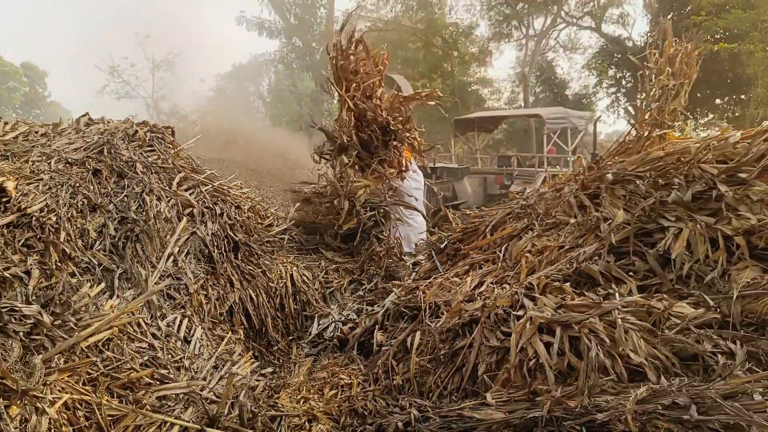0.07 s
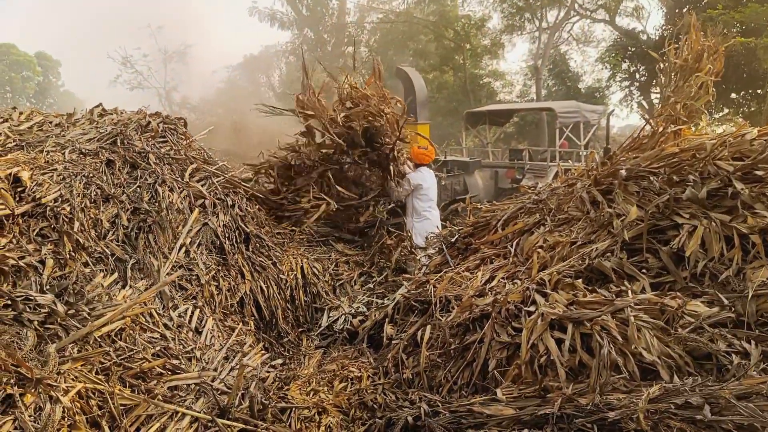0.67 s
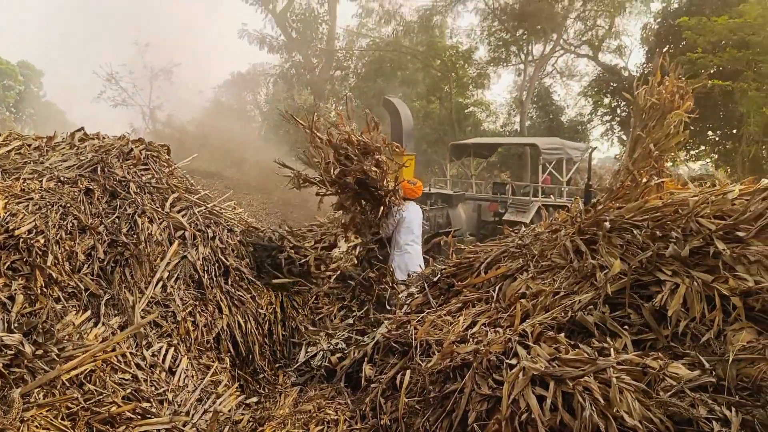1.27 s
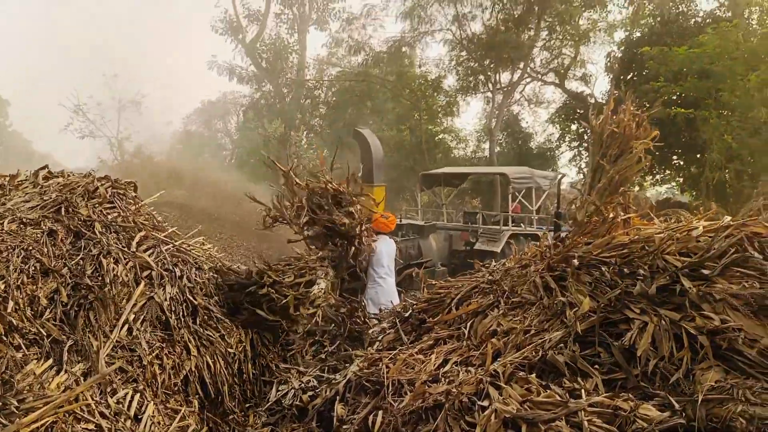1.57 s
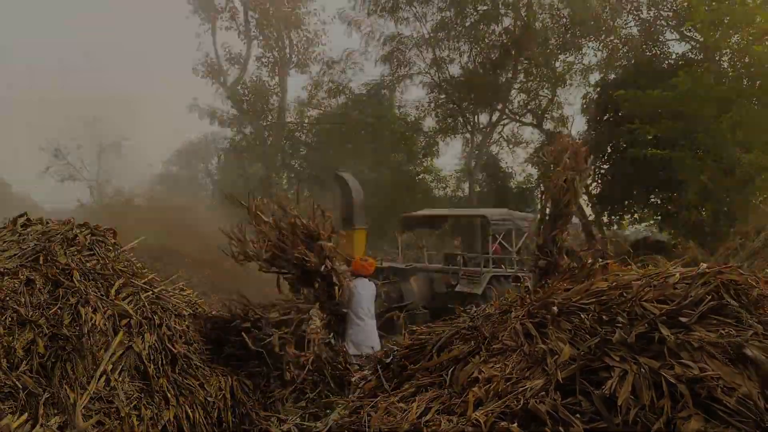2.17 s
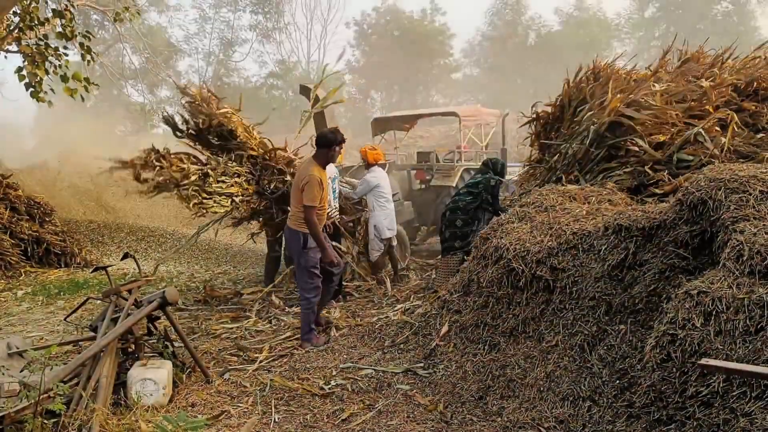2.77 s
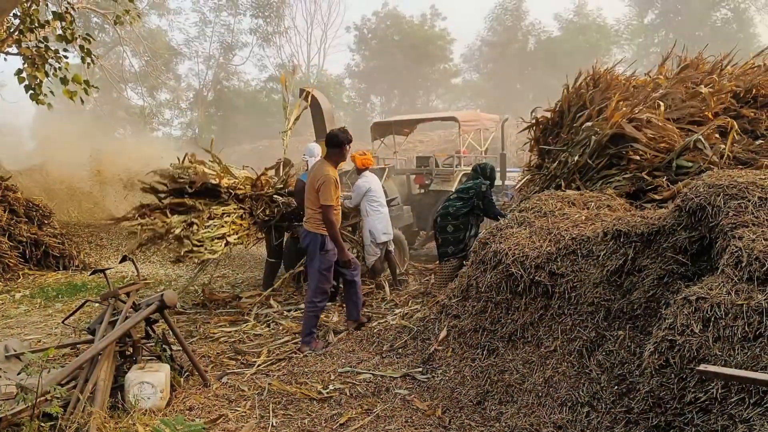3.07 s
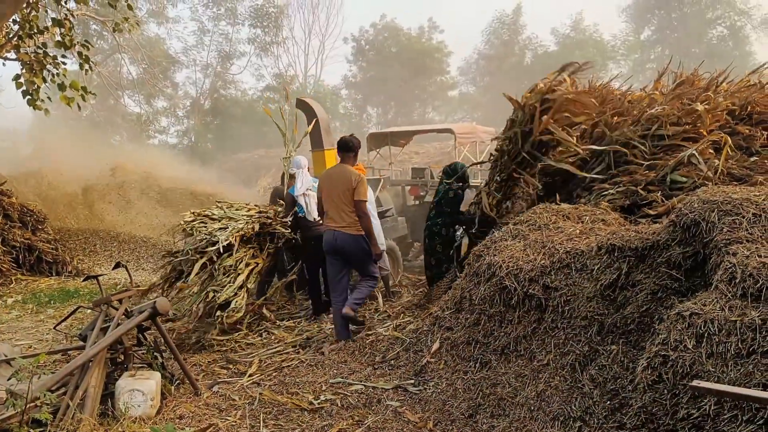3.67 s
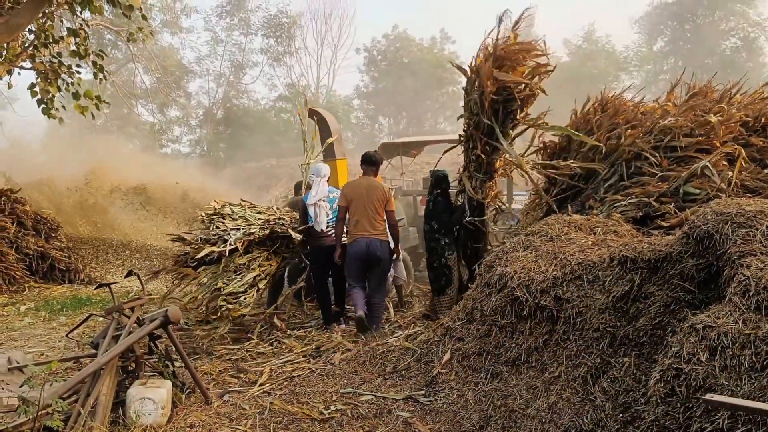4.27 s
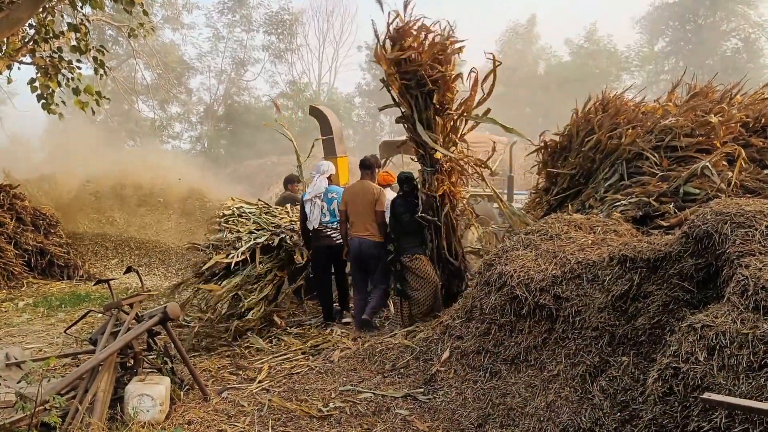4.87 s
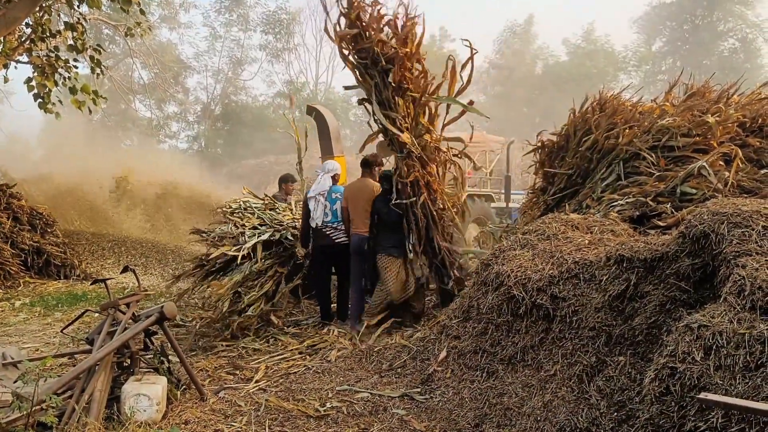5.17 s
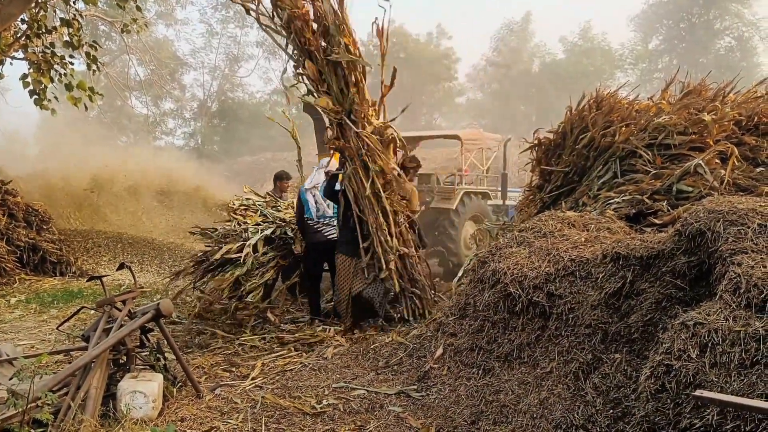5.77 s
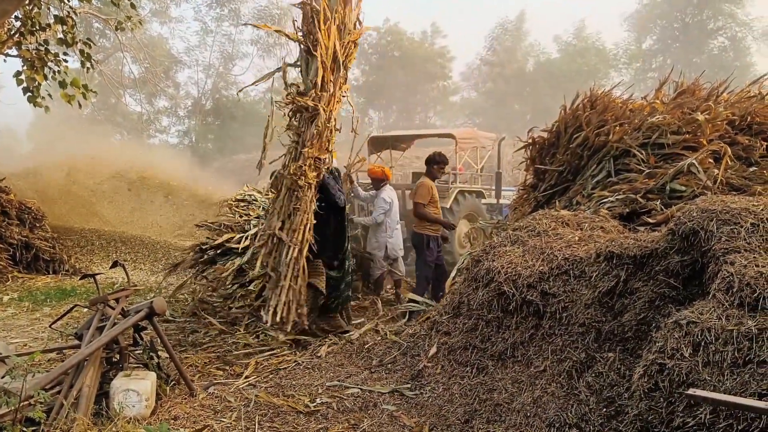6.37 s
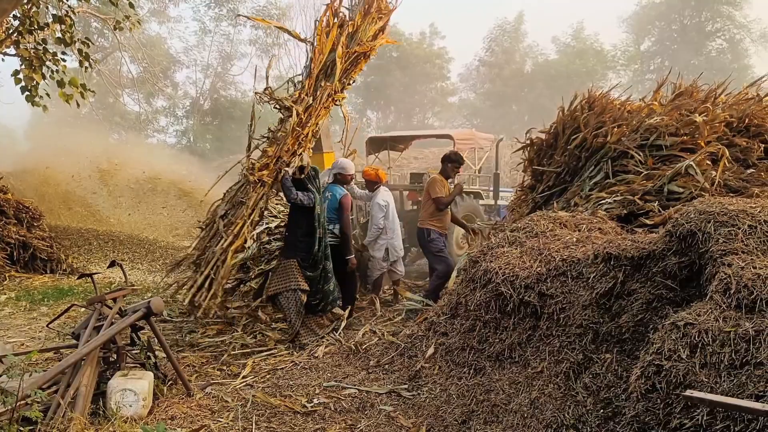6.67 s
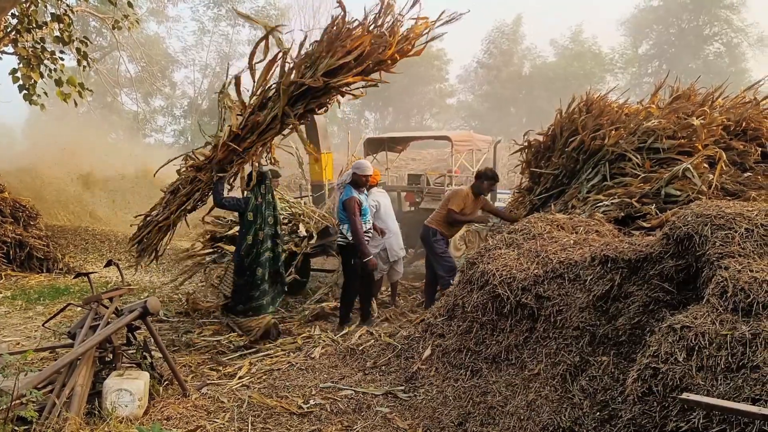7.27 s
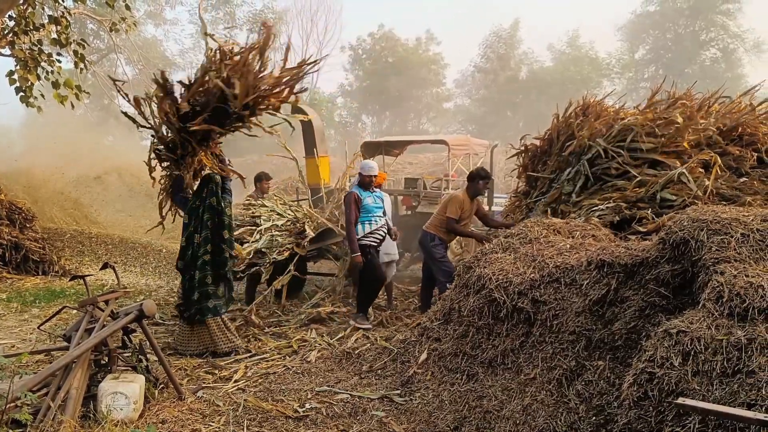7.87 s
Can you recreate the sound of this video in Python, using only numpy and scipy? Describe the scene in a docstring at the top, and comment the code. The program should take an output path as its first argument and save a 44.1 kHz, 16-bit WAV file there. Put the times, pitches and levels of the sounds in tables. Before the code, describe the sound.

Loud, rapid chopping pulses from a stalk cutter in a farmyard, with a steady air roar, the hiss of chaff up its spout and a droning tractor engine. The sound dips to silence a little after two seconds, then comes back from another side of the machine, rounder and with a faint hum of gears. Carried bundles rustle lightly, and toward the end thicker stalks crunch harder and ring against the steel knives.

```python
"""A rapid chopping, about 17 crunching thumps a second: a tractor drives a chaff cutter in an open yard.
Each knife stroke fractures stalks, and its paddle throws a puff of air that excites the housing's modes.
Thicker stalks crunch and ring harder; now and then a wad of leaves is shredded in one rush.
The blower roars, chaff hisses up the spout, the diesel drones and dry bundles rustle as they are carried.
The machine is heard from beside the stalk heap, then, after a fade, from the feeding side."""
import sys
import numpy as np
from scipy import signal
from scipy.fft import rfft, irfft
from scipy.io import wavfile

SR = 44100
rng = np.random.default_rng(int(sys.argv[2]) if len(sys.argv) > 2 else 0)


def master(y):
    """Save y as 16-bit WAV."""
    cut = np.clip(np.atleast_2d(y).T, -1, 1)
    pcm = np.round(cut * 32767)  # scale
    wavfile.write(sys.argv[1], SR, pcm.astype(np.int16))


N = 354123
TIME = np.arange(N) / SR
FREQS = np.maximum(np.fft.rfftfreq(N, 1 / SR), 1)


# cutting rate of the flywheel: t/s, f/Hz
HEAP_CUT_RATE = [(0.0, 16.35), (0.4, 16.586), (0.8, 16.703), (1.3, 16.62), (1.8, 16.755), (2.35, 16.659)]
FEED_CUT_RATE = [(2.35, 16.537), (3.0, 16.652), (3.6, 16.708), (4.2, 16.681), (4.7, 16.632), (5.2, 16.957),
                 (5.8, 16.905), (6.6, 17.028), (7.3, 16.865), (8.03, 16.795)]
# single cuts that stand out: t/s, extra thump level/dB, extra crunch level/dB
ACCENTS = [(1.02, 3, 2.5), (1.08, 4.5, 1.5), (1.8, -5, 0.5), (1.92, 4.5, 3), (3.1, 3, -3), (3.28, -6.5, 0),
           (3.46, 1.5, -1.5), (5.08, -0.5, 2), (5.2, -1.5, 7), (5.26, 3.5, 4), (6.14, 1.5, 1.5),
           (6.91, 4, 2)]
def knife_passes(rate, first_s, gap_db):
    """Periodic excitation: two knives thump in turn at +/- gap_db; gives times, thump dB, crunch dB."""
    count = np.cumsum(in_time(rate)[0]) / SR
    count -= np.interp(first_s, TIME, count)
    cuts = np.arange(np.ceil(count[0]), count[-1])
    times = np.interp(cuts, count, TIME)
    extra_db = np.zeros((2, len(times)))
    for s, thump_db, crunch_db in ACCENTS:
        extra_db[:, np.argmin(np.abs(times - s))] += thump_db, crunch_db
    return times, gap_db * np.cos(np.pi * cuts) + extra_db[0], extra_db[1]


def pulse_train(times, cut_db, width_s, uneven_db, jitter_s):
    """Spectrum of a train of Gaussian pulses, with random spread in strength and timing."""
    strength, late = rng.standard_normal((len(times), 2)).T
    samples = np.clip((times + jitter_s * late) * SR, 0, N - 1).astype(int)
    clicks = np.zeros(N)
    clicks[samples] = from_db(cut_db + uneven_db * strength)
    return rfft(clicks) * np.exp(-.5 * (2 * np.pi * FREQS * width_s) ** 2)


# modes of the housing: f/Hz, level against the puff/dB, T60/s
HEAP_MODES = [(81.6, -11, 0.13), (117.8, -9, 0.12), (153, -11, 0.091), (274, -6, 0.043)]
FEED_MODES = [(83, -17.5, 0.22), (116, -2.5, 0.12), (208.4, -14.5, 0.47), (252, -22.5, 0.33),
              (306, -18, 0.21), (392, -16, 0.026)]
def thumps(times, cut_db, modes, width_s, uneven_db, lag_s):
    """Pressure doublet: each paddle sucks, then pushes the air, and the housing's damped modes ring on."""
    doublet = -2j * np.pi * FREQS * width_s
    ring = sum(from_db(db - 60 * TIME / t60) * np.cos(2 * np.pi * hz * TIME) for hz, db, t60 in modes)
    puffs = pulse_train(times, cut_db, width_s, uneven_db, jitter_s=0.00028)
    return stereo(puffs * (doublet + rfft(ring) / (4 * width_s * SR)), lag_s)


# spectrum of snapping stalks: f/Hz, relative level/dB
HEAP_SNAP = [(50, -34), (150, -13), (330, -4), (550, -2), (800, -3), (1150, -8.5), (1500, -11), (2400, -9),
             (3500, -29.5), (6000, -13), (7500, -39), (14000, -49)]
FEED_SNAP = [(50, -48), (150, -15.5), (330, 3), (550, -5.5), (800, -5), (1150, -9), (1500, -8.5),
             (2400, -19), (3500, -30.5), (6000, -25.5), (7500, -37.5), (14000, -42.5)]
def crunches(times, cut_db, spectrum, lead_s, rise_s, decay_s, tail, tail_s, uneven_db, grain_db, lag_s):
    """Brittle fracture: stalks snap in a noise burst just before each thump; the pieces clatter after."""
    decay = np.exp(-TIME / decay_s) + tail * np.exp(-TIME / tail_s)
    bites = pulse_train(times, cut_db, rise_s, uneven_db, jitter_s=0.00048) * delay(-lead_s)
    bursts = irfft(bites * rfft(decay), N)
    return rms_one(bursts * from_db(grain_db * drift(880)) * air_noise(spectrum, lag_s))


# modes of the knives: f/Hz, bandwidth/Hz, relative level/dB
KNIFE_MODES = [(840, 150, 1.5), (1353, 110, 8), (2095, 114, 4.5), (2600, 160, 8), (4120, 210, 9)]
def clinks(times, load_db, uneven_db, lag_s, rise_s=0.00097, lead_s=.005):
    """Free vibration: thick stalks strike the steel, giving each mode a new strength at every cut."""
    ringing = 0
    for hz, width_hz, db in KNIFE_MODES:
        envelope = from_db(db) * np.exp(-np.pi * width_hz * TIME) * (1 - np.exp(-TIME / rise_s))
        strikes = pulse_train(times, 0, width_s=.00003, uneven_db=uneven_db, jitter_s=0.001192)
        ringing += strikes * rfft(envelope * np.sin(2 * np.pi * hz * TIME))
    level_db = -25 + 2.18 * (load_db - load_db.max())  # falls steeply below full load
    return from_db(level_db) * rms_one(stereo(ringing * delay(-lead_s), lag_s))


# wads of leaves under the knives: start t/s, end t/s, level/dB
LEAF_WADS = [(-0.1, .12, -26.5), (2.313, 2.962, -20.5), (5.943, 6.283, -29.5)]
# spectrum of tearing leaves: f/Hz, relative level/dB
TEARING = [(60, -22), (200, 2), (400, 4), (600, 0), (950, 0), (1500, 3.5), (2400, -4.5), (3300, -11),
           (5000, -10), (6300, -14), (8000, -35), (15000, -39)]
def shredding(attack_s=0.097, release_s=0.088):
    """Continuous tearing: a wad of leaves is dragged through in one coarse rush of broadband noise."""
    rush = sum(from_db(db) * np.interp(TIME, [start, start + attack_s, end, end + release_s], [0, 1, 1, 0])
               for start, end, db in LEAF_WADS)
    return rush * stream(TEARING, flutter_db=1.1, grain_db=1.5, lag_s=0.00017)


# spectrum of the blower's air flow: f/Hz, relative level/dB
HEAP_BLOWER = [(35, -14), (60, -16), (120, -10), (250, -5.5), (500, -2), (800, -4.5), (1200, -13),
               (1700, -12), (2350, -6), (3000, -18), (4000, -37.5)]
FEED_BLOWER = [(35, -45), (60, -22), (120, 2.5), (250, -7), (400, -3.5), (620, -10.5), (850, -11),
               (1130, -9), (1450, -5.5), (1850, -15), (2250, -9.5), (3000, -23), (4000, -42.5)]
def blower_roar(spectrum, load_db, level_db, **texture):
    """Flow noise: the blower roars a little louder as the load rises above its mean."""
    return from_db(level_db + 0.16 * (load_db - load_db.mean())) * stream(spectrum, **texture)


# spectrum of flying chaff: f/Hz, relative level/dB
HEAP_CHAFF = [(2400, -24), (3500, 0), (4500, -1), (5400, 2.5), (6200, 4.5), (6800, -7.5), (7500, -13.5),
              (9000, -24), (12000, -18), (15800, -40)]
FEED_CHAFF = [(2400, -4), (3500, -1.5), (4500, -1), (5400, -4), (6200, -1), (6800, -12), (7500, -15.5),
              (9000, -25), (12000, -20.5), (15800, -31)]
# gushes up the spout: middle t/s, duration/s, extra level/dB
CHAFF_GUSHES = [(.2, 0.61, 2), (0.94, .2, 5.5), (1.592, .2, 4), (1.933, 0.093, 4.5), (2.17, 0.28, 4),
                (3.72, 0.64, 1)]
def chaff_hiss(spectrum, load_db, level_db, **texture):
    """Particle noise: the hiss of chaff follows the load and swells with each gush."""
    gush_db = sum(db * swell(s, length) for s, length, db in CHAFF_GUSHES)
    return from_db(level_db + 0.36 * (load_db - load_db.mean()) + gush_db) * stream(spectrum, **texture)


def stream(spectrum, flutter_db, grain_db, lag_s):
    """Amplitude modulation: slow random flutter and fast grain roughen a steady flow noise; rms 1."""
    return rms_one(air_noise(spectrum, lag_s) * from_db(flutter_db * drift(26) + grain_db * drift(1200)))


# resonance of the spout: t/s, centre f/Hz, level/dB
SPOUT_BAND = [(0, 5860, -29.5), (.35, 6060, -28), (.6, 5970, -33), (1, 5900, -53), (1.3, 6330, -35.5),
              (2, 6400, -35), (2.35, 6260, -20.5)]
def spout_ring(width_hz=400, flutter_db=3):
    """Frictional excitation: chaff scouring the steel spout makes a narrow, shifting band of noise."""
    hz, db = in_time(SPOUT_BAND)
    phase = 2 * np.pi * np.cumsum(hz) / SR
    band = np.array([drift(width_hz) * np.cos(phase) + drift(width_hz) * np.sin(phase) for _ in range(2)])
    return from_db(db) * rms_one(band * from_db(flutter_db * drift(30)))


# engine orders: multiple of the crank rate, level/dB
ENGINE_ORDERS = [(1, -65), (2, -40.5), (3, -36.5), (4, -31), (6, -32.5)]
def diesel(rate, waver_db, waver_hz=4):
    """Harmonic series: the engine drones at multiples of its crank rate, each one wavering in level."""
    crank = 2.07 * cut_phase(rate)  # crank turns per cut
    drone = 0
    for order, db in ENGINE_ORDERS:
        gain = from_db(db + waver_db * drift(waver_hz))
        drone += gain * np.sin(order * crank + rng.uniform(0, 2 * np.pi))
    return np.sqrt(2) * drone


# gear hum: t/s, mesh tone level/dB, octave level/dB
GEAR_HUM = [(2.5, -35.5, -37), (4.2, -34.5, -43.5), (5, -35.5, -48), (6.1, -49, -36), (6.7, -35.5, -42.5),
            (8, -37, -40.5)]
def gears(waver_db):
    """Gear-mesh tone: fifteen teeth engage for each cut, and their play modulates the phase."""
    mesh = 15 * cut_phase(FEED_CUT_RATE) + .5 * drift(14)
    tone_db, octave_db = in_time(GEAR_HUM) + waver_db * drift(28)
    return np.sqrt(2) * (from_db(tone_db) * np.sin(mesh) + from_db(octave_db) * np.sin(2 * mesh))


# bundles being carried: middle t/s, duration/s, level/dB
RUSTLES = [(0.696, 0.46, -38.5), (1.6, .16, -45), (4.48, .32, -38.5), (5.114, 0.14, -33.5),
           (5.2, 0.14, -42), (5.62, .2, -44), (6.19, 0.19, -36.5), (6.31, 0.28, -36.5)]
# spectrum of dry leaves: f/Hz, relative level/dB
DRY_LEAVES = [(1500, -16), (4500, 10), (6300, 9), (8000, -7), (10000, -1), (12000, 0.5), (15800, -3)]
def bundles(grain_db):
    """Friction noise: dry leaves brush each other in swells of fine crackle."""
    brushing = sum(from_db(db) * swell(s, length) for s, length, db in RUSTLES)
    return brushing * rms_one(air_noise(DRY_LEAVES, lag_s=0) * from_db(grain_db * drift(1500)))


# echoes from tractor and yard: delay t/s, amplitude ratio
HEAP_REFLECTIONS = [(.0072, 0.2), (0.0179, 0.21), (.034, 0.16)]
FEED_REFLECTIONS = [(.0075, 0.041), (0.017, 0.096), (0.0189, .3)]
def yard(x, echoes):
    """Radiation and reflection: the small opening emits little deep bass; early echoes follow; rms 1."""
    paths = 1 + sum(share * delay(s) for s, share in echoes)
    return rms_one(irfft(rfft(x) * paths / np.sqrt(1 + (62 / FREQS) ** 10), N))


def scatter(x, share, decay_s):
    """Interference: many small reflections off steel and stalks ripple the lower treble finely."""
    reflections = rms_one(rng.standard_normal((2, N)) * np.exp(-TIME / decay_s)) / np.sqrt(N)
    amount = share * FREQS / np.hypot(FREQS, 1200) / (1 + (FREQS / 8000) ** 4)
    return irfft(rfft(x) * (1 + amount * rfft(reflections)) / np.hypot(1, amount), N)


def resonate(x, modes):
    """Resonance: each mode lifts or sinks a band, and rings the longer the narrower it is."""
    response = 1
    for hz, width_hz, db in modes:
        detune = 1j * (FREQS - hz ** 2 / FREQS) / width_hz
        height = from_db(db / 2)
        response = response * (height + detune) / (1 / height + detune)
    return irfft(rfft(x) * response, N)


# peaks and dips of the path past the heaps, before and after the walk: f/Hz, bandwidth/Hz, level/dB
PATH_BEFORE = [(355, 36, 5), (536, 107, -12.5), (1020, 190, 3.5), (1270, 250, -10.5), (1640, 190, 3),
               (2120, 280, -11.5), (4500, 190, -1), (5100, 370, -3.5)]
PATH_AFTER = [(442, 39, -6.5), (555, 93, 2.5), (950, 130, -6.5), (1370, 210, 2.5), (1850, 210, -6.5),
              (2250, 140, 2), (2640, 690, -5.5), (3080, 160, 8), (3450, 210, -6), (4700, 42, 1)]
def walk(x):
    """Transfer function: one path's colouring blends into another's as the listener walks."""
    walked = np.interp(TIME, [.6, 1.5], [0, 1])
    return (1 - walked) * resonate(x, PATH_BEFORE) + walked * resonate(x, PATH_AFTER)


# likeness of the noise at the two ears: f/Hz, coherence
COHERENCE = [(100, 0.98), (400, 1), (800, 0.93), (1500, 0.94), (3000, 0.22), (6000, 0.14), (9000, .1)]
def air_noise(spectrum, lag_s):
    """Interaural coherence: coloured noise, alike in the bass, reaches the right ear later; rms 1."""
    mid, side = rfft(rng.standard_normal((2, N)))
    alike = np.clip(at_freqs(COHERENCE), 0, 1)
    mid, side = mid * np.sqrt(1 + alike), side * np.sqrt(1 - alike)
    pair = np.array([mid + side, (mid - side) * delay(lag_s)])
    return rms_one(irfft(pair * from_db(at_freqs(spectrum)), N))


# level difference between the ears: f/Hz, left minus right level/dB
HEAP_EARS = [(100, -9), (330, 1), (600, -0.5), (850, -0.5), (1450, 0), (2000, -5.5), (2400, -10),
             (3300, -7.5), (4300, -2), (5700, -18.5), (6900, -6.5), (8000, 9), (10500, 5), (14000, -2)]
FEED_EARS = [(200, 1), (600, -3.5), (850, -1.5), (1100, 2.5), (1450, -8), (2000, -7.5), (2400, -8),
             (3300, -7), (4300, -7.5), (5700, -14), (6900, 2), (8000, 7), (10500, 8), (14000, -1.5)]
def ears(x, balance, shadow_hz=250):
    """Head shadow: each frequency's power is shared unequally, but the bass reaches both ears alike."""
    ratio = from_db(at_freqs(balance) / (1 + (shadow_hz / FREQS) ** 4))
    gains = np.array([ratio, np.ones_like(ratio)]) * np.sqrt(2 / (1 + ratio ** 2))
    return irfft(rfft(x) * gains, N)


def stereo(spectrum, lag_s):
    """Interaural time difference: the same wave reaches the right ear lag_s later."""
    return irfft(np.array([spectrum, spectrum * delay(lag_s)]), N)


def cut_phase(rate):
    """Phase as the integral of frequency: one cycle for every cut."""
    return 2 * np.pi * np.cumsum(in_time(rate)[0]) / SR


def delay(s):
    """Linear phase: the response of a pure delay."""
    return np.exp(-2j * np.pi * FREQS * s)


def drift(rate_hz):
    """Random fluctuation: low-passed noise of rms 1."""
    return rms_one(irfft(rfft(rng.standard_normal(N)) / (1 + (FREQS / rate_hz) ** 2) ** 2, N))


def swell(middle_s, length_s):
    """Half-cosine envelope, from 0 to 1 and back."""
    return np.cos(np.pi * np.clip((TIME - middle_s) / length_s, -.5, .5))


def in_time(rows):
    """Linear interpolation of each column at every sample."""
    s, *columns = np.transpose(rows)
    return [np.interp(TIME, s, column) for column in columns]


def at_freqs(points):
    """Interpolation of a spectrum over log frequency."""
    hz, value = np.transpose(points)
    return np.interp(np.log(FREQS), np.log(hz), value)


def from_db(db):
    """Level to amplitude ratio."""
    return 10 ** (np.asarray(db) / 20)


def rms_one(x):
    """Normalisation to an rms of 1."""
    return x / np.sqrt(np.mean(x ** 2) + 1e-20)


# strength of the paddles' thump: t/s, level/dB
HEAP_PADDLES = [(0, -21), (1.1, -20.5), (1.75, -22), (2.0, -19)]
# load of stalks under the knives, as their crunch: t/s, level/dB
HEAP_STALKS = [(0, -21.5), (0.3, -18), (0.6, -25), (1.15, -20.5), (1.5, -25), (2.3, -26)]
def beside_heap():
    """Superposition beside the heap: a hard crunch and a ringing spout, coloured by the walk."""
    times, push_db, bite_db = knife_passes(HEAP_CUT_RATE, first_s=.0581, gap_db=.9)
    (thump_db,), (load_db,) = in_time(HEAP_PADDLES), in_time(HEAP_STALKS)
    thump = thumps(times, push_db, HEAP_MODES, width_s=0.00068, uneven_db=0.5, lag_s=.00002)
    crunch = crunches(times, bite_db, HEAP_SNAP, lead_s=0.004, rise_s=0.0012, decay_s=0.004,
                      tail=0.4, tail_s=0.012, uneven_db=0.7, grain_db=3.05, lag_s=.00003)
    cuts = from_db(thump_db) * yard(thump, HEAP_REFLECTIONS)
    cuts += from_db(load_db) * yard(crunch, HEAP_REFLECTIONS)
    roar = blower_roar(HEAP_BLOWER, load_db, level_db=-25.5, flutter_db=1.65, grain_db=1, lag_s=.00003)
    hiss = chaff_hiss(HEAP_CHAFF, load_db, level_db=-33, flutter_db=1.1, grain_db=1.6, lag_s=0.00013)
    machine = scatter(cuts + roar + hiss + shredding() + spout_ring(), share=0.35, decay_s=0.013)
    return ears(walk(machine) + diesel(HEAP_CUT_RATE, waver_db=1.1) + bundles(grain_db=4.5), HEAP_EARS)


# thump, and load of stalks as their crunch, at the feeding side: t/s, level/dB
FEED_PADDLES = [(2.5, -18.5), (3.2, -19), (4.8, -18.5), (5.6, -21), (7.1, -24), (7.5, -19)]
FEED_STALKS = [(3.0, -26.5), (4.5, -28), (4.8, -31.5), (6.35, -29), (6.85, -24), (7.05, -24.5),
               (7.3, -22.5), (7.55, -22), (7.7, -23), (8.0, -21.5)]
# peaks and dips of the steel hood: f/Hz, bandwidth/Hz, level/dB
HOOD_MODES = [(287, 114, 2), (323.7, 42, -1.5), (397.5, 115, 4), (890, 140, 3.5), (1183, 75, -7.5),
              (1570, 110, 2.5), (1845, 235, -7.5), (2275, 130, 2.5), (3930, 1640, -0.5)]
def feeding_side():
    """Superposition at the feeding side: a rounder thump and ringing knives, coloured by the hood."""
    times, push_db, bite_db = knife_passes(FEED_CUT_RATE, first_s=2.4993, gap_db=.5)
    (thump_db,), (load_db,) = in_time(FEED_PADDLES), in_time(FEED_STALKS)
    thump = thumps(times, push_db, FEED_MODES, width_s=0.0008, uneven_db=0.4, lag_s=.0001)
    crunch = crunches(times, bite_db, FEED_SNAP, lead_s=0.0052, rise_s=0.0013, decay_s=0.012,
                      tail=0.5, tail_s=0.013, uneven_db=2.0, grain_db=1.5, lag_s=0.00014)
    cuts = from_db(thump_db) * yard(thump, FEED_REFLECTIONS)
    cuts += from_db(load_db) * yard(resonate(crunch, KNIFE_MODES), FEED_REFLECTIONS)
    roar = blower_roar(FEED_BLOWER, load_db, level_db=-25.5, flutter_db=0.94, grain_db=.9, lag_s=.00016)
    hiss = chaff_hiss(FEED_CHAFF, load_db, level_db=-32, flutter_db=1.18, grain_db=1.2, lag_s=0.00047)
    clink = clinks(times, load_db, uneven_db=3.8, lag_s=.00015)
    machine = scatter(cuts + clink + roar + hiss + shredding(), share=0.57, decay_s=0.003)
    drive = diesel(FEED_CUT_RATE, waver_db=3.0) + gears(waver_db=6.5)
    return ears(resonate(machine, HOOD_MODES) + drive + bundles(grain_db=2), FEED_EARS)


def scene():
    """Two listening points in turn: the first fades to silence, then the second fades in."""
    move_s, fade_out_s, fade_in_s = 2.334, 0.47, 0.42
    fade = np.interp(TIME, [move_s - fade_out_s, move_s, move_s + fade_in_s], [1, 0, 1])
    return fade * np.where(TIME < move_s, beside_heap(), feeding_side())


def record(dry):
    """Soft saturation rounds the tallest peaks; a low-pass filter cuts the top above 15.8 kHz."""
    rounded = dry / (1 + (dry / .92) ** 6) ** (1 / 6)
    return signal.sosfilt(signal.ellip(12, .1, 90, 15800, fs=SR, output="sos"), rounded)


dry = scene()
out = record(dry)
master(out)
```